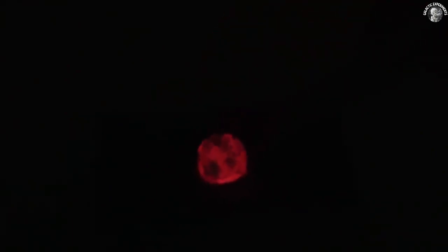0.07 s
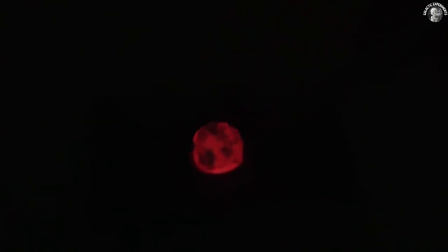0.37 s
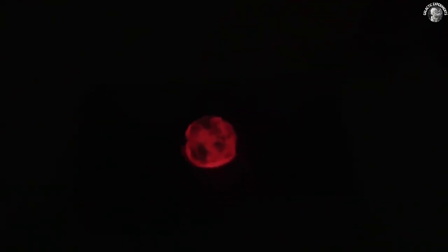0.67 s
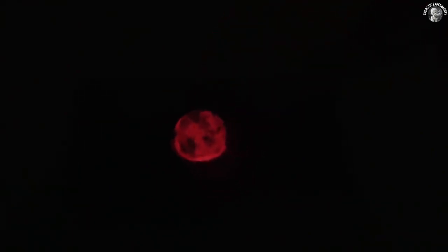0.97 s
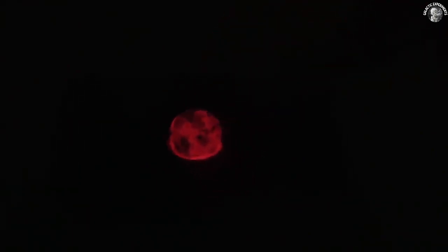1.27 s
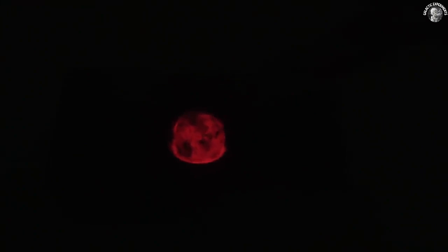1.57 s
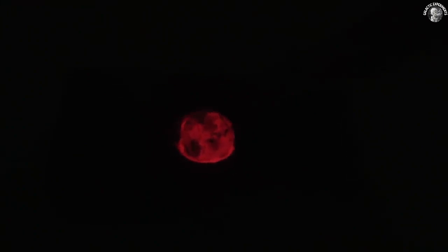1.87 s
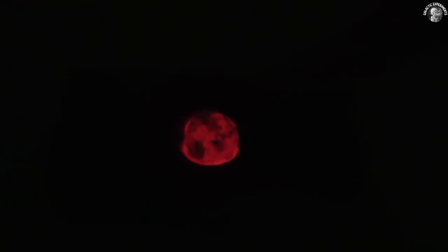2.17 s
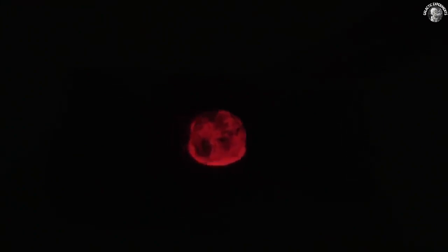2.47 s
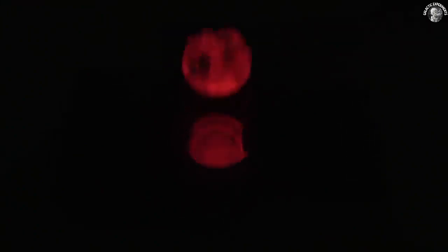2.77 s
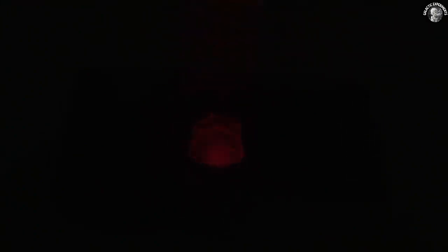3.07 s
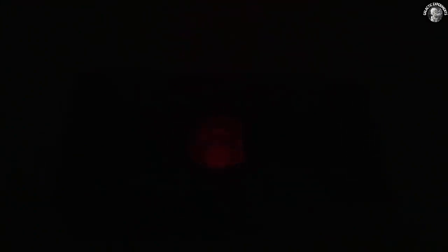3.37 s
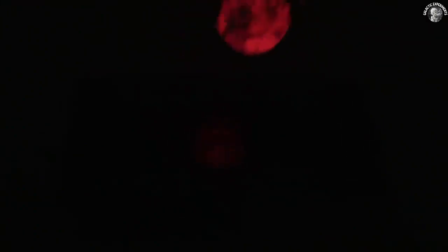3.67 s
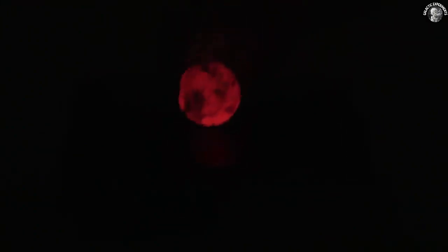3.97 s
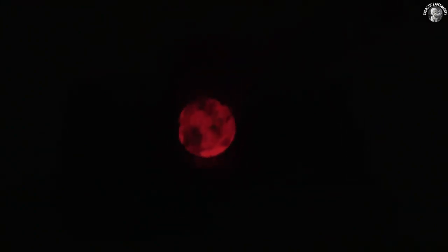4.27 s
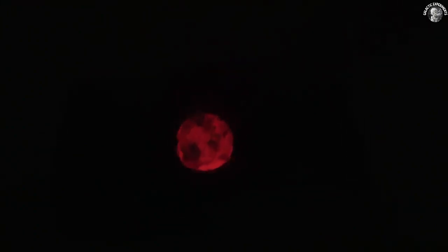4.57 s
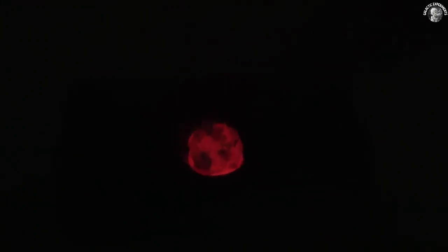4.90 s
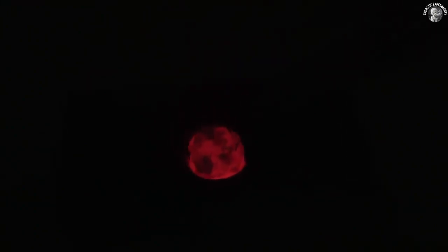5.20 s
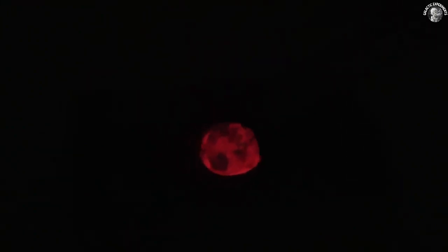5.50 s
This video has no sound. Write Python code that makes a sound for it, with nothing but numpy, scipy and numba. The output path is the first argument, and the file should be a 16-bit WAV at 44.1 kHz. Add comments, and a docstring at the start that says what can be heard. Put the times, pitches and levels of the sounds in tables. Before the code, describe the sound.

Melting foam hisses in rumbling spurts and pops under a red-hot metal ball, pausing when it is lifted, over a faint fan.

```python
"""A red-hot metal ball sinks into a block of foam, close by, in a quiet room with a fan.
From the start, gas from the melting foam hisses out in rumbling spurts, coloured by each vent it opens.
Tiny cells fizz and larger pockets pop, ringing the hollow under the ball, loudest near 1.6 s.
Near 2.7 s the ball is lifted off and the hiss sinks away, leaving faint ticks and the fan.
At 4.7 s the ball is back: spurts and pops resume for about a second, then fade."""
import sys
import numpy as np
from scipy import signal
from scipy.fft import rfft, irfft, next_fast_len
from scipy.io import wavfile
from numba import njit

SR = 44100
rng = np.random.default_rng(int(sys.argv[2]) if len(sys.argv) > 2 else 0)


def generate_wav(sig):
    """Save sig (samples, or channels by samples) to the path in sys.argv[1] as 16-bit PCM at SR."""
    pcm = np.round(np.clip(np.atleast_2d(sig).T, -1, 1) * 32767).astype(np.int16)
    wavfile.write(sys.argv[1], SR, pcm)


N = 253134
T = np.arange(N) / SR

# Steady boiling of the foam. Each row: time in seconds, level in dB, treble in dB.
BOILING = [(0, -50, -10), (.2, -48.5, -5.5), (.27, -55, -2), (.35, -47, -0.5), (.63, -45, -1),
           (.9, -47.5, -4), (1.9, -54, -5.5), (2.348, -53.5, -4), (2.71, -53.5, -20), (2.9, -63, -11),
           (4.65, -65.5, -11.5), (4.72, -52, -14), (5.17, -45, -7), (5.74, -59, -16)]
# Spurts of gas. Each row: time of full strength, rise, hold and fall, all in seconds,
# then level, treble and rumble in dB.
GAS_SPURTS = [ (0, .02, 0.043, .035, -31.5, -9, -66), (0.062, .03, .045, 0.051, -41.5, -2, -60),
              (0.712, 0.13, 0.05, .15, -36, 1, -80), (0.794, 0.076, 0.037, 0.077, -31, -3, -57),
              (0.947, 0.036, .025, .05, -38, 3.5, -73), (.985, 0.044, 0.11, .1, -29.5, -5, -62),
              (1.104, 0.17, 0.036, 0.1, -29, -3, -52), (1.181, 0.17, 0.53, 0.13, -32.7, -1, -59.5),
              (1.408, 0.12, 0.0088, 0.11, -30.5, -4.5, -61), (1.593, 0.12, 0.058, 0.12, -32, -3.5, -58),
              (1.727, .08, 0.05, 0.088, -38.5, -1.5, -62), (1.782, .05, 0.04, 0.048, -39.5, -3.5, -64),
              (2.065, 0.41, 0.074, 0.19, -47, -1.5, -74), (2.522, 0.095, 0.068, 0.058, -36, -5.5, -76),
              (2.598, 0.066, 0.024, 0.028, -33.5, -6.5, -76), (3.695, .05, 0.048, 0.14, -68, 6.5, -90),
              (4.708, 0.0082, .008, .05, -33.5, -1.5, -52), (4.728, 0.023, 0.053, 0.12, -31.5, -8.5, -61),
              (4.846, 0.1, .12, 0.11, -39, -17, -57), (5.22, 0.11, .005, 0.11, -41, -5.5, -60),
              (5.324, 0.025, 0.0026, 0.019, -35, -8.5, -58), (5.424, 0.1, 0.014, 0.025, -32, -5, -51.5),
              (5.486, 0.14, .02, 0.16, -47.5, -18, -52)]
# Gaps that the gas opens round the ball. Each row: opening and closing time in seconds,
# then a list of resonances, each with frequency in Hz, bandwidth in Hz, boost in dB.
GAS_VENTS = [ (-.05, 0.14, [(615, 58, 13.5), (1170, 260, 9.5), (1650, 130, 7.5), (2790, 120, 6.5)]),
             (0.666, 1.843, [(667, 50, 15), (1020, 90, -4), (1230, 76, 8), (1415, 19, 14.5), (1800, 110, 6),
             (2930, 120, 2.5), (4540, 210, 2.5)]), (1.84, 2.219, [(746, 160, 16.5)]),
             (2.19, 2.457, [(414, 65, 22.5)]), (2.46, 2.708, [(680, 65, 11), (900, 63, 11), (1936, 53, 10),
             (2480, 150, 7.5), (2870, 110, 7.5), (3700, 550, 5.5)]), (4.675, 4.836, [(2410, 80, 6),
             (3890, 310, 9.5), (4580, 120, 7.5)]), (4.68, 5.39, [(550, 330, 5), (970, 200, 7.5),
             (1810, 300, 3)]), (5.399, 5.475, [(710, 240, 9.5), (1880, 80, 11.5), (2910, 550, 11),
             (3700, 250, 4), (6900, 360, 9)])]
# Spectra of the bare jet, the shaken block and the fan with the room air.
# Each row: frequency in Hz, relative spectral density in dB.
JET_SPECTRUM = [(40, -50), (110, -10.5), (240, -8), (360, -10), (560, -5.5), (900, -4.5), (1300, 0),
                (2300, -0.5), (4500, 1.5), (7500, 2.5), (10000, -2), (13000, -7), (16000, -16.5)]
RUMBLE_SPECTRUM = [(20, -22), (40, -2), (90, -16), (112, 3.5), (135, -10), (240, -9.5), (340, -14),
                   (700, -48)]
FAN_SPECTRUM = [(20, -10), (40, -8), (112, -4.5), (160, -7.5), (400, -3.5), (580, -3.5), (780, 4.5),
                (930, -0.5), (1110, 3), (1330, -13), (1800, -20), (4500, -26), (7000, -20), (16000, -30)]
# Bursting gas pockets. Each row: start in seconds, level in dB, crack frequency in Hz,
# crack t60 in seconds, weight of the bright snap in dB, weight of the hollow and spray in dB.
POCKETS = [ (0.0315, -16.5, 5140, 0.0018, -3, -1.5), (0.033, -19, 1044, 0.022, -30, -20),
           (.4590, -22, 6460, 0.0061, 5, -9), (0.509, -31.5, 1930, 0.0082, -16, 5),
           (0.5476, -22, 9300, 0.0032, -2, -7), (0.9939, -1.5, 7870, 0.0033, -4, -0.5),
           (1.5697, 8, 3950, 0.0024, -5.5, -5.5), (2.2, -35, 777, 0.028, -37, -10.5),
           (2.348, -28.5, 336, 0.015, -30, -20), (3.0453, -39, 7000, 0.0032, -9, -20),
           (3.169, -45, 6000, .003, 9, -20), (3.3914, -38, 8300, 0.0033, -6, -17),
           (3.5126, -40, 7500, .003, -2, -20), (3.763, -43, 6500, 0.0035, 10.5, -20),
           (4.0375, -36.5, 4430, 0.003, -6, -16), (4.688, -38.5, 7000, 0.0032, 6, -18),
           (4.8875, -9, 2700, 0.0038, -3.5, -20), (4.9722, -9, 1070, 0.0039, -30, -33),
           (5.3125, -29, 726, 0.02, -30, -16), (5.3159, -22.5, 230, 0.02, -40, -20)]
# Modes of the hollow under the ball. Each row: frequency in Hz, relative level in dB, t60 in seconds.
HOLLOW_MODES = [(216, -17.5, 0.043), (620.4, -8.5, 0.16), (1030, 3, 0.054), (1161, 6, 0.065),
                (1404, 9.5, 0.038), (1607, 7.5, 0.035)]
# Reflections from nearby surfaces. Each row: delay in seconds, level in dB.
REFLECTIONS = [(.0041, -23), (.0088, -23)]
# Stereo width of the hiss, the pops and the fan. Each row: frequency in Hz, side over mid in dB.
HISS_SPREAD = [(100, -13), (650, -16), (1000, -32), (1400, -55), (4900, -52), (5700, -15), (9000, -10),
               (15000, -11)]
POP_SPREAD = [(200, -5), (700, -16), (1400, -34), (2500, -20), (5000, -20), (7000, -12), (15000, -8)]
FAN_SPREAD = [(50, -13), (130, -8), (700, -11), (1300, -10), (2000, -13), (3200, -20), (4800, -9),
              (6500, -4), (15000, -5)]
# Stereo balance of the foam and the fan. Each row: frequency in Hz, left over right in dB.
FOAM_BALANCE = [(200, 2.5), (400, .3), (700, -3), (1050, 0), (15000, 0)]
FAN_BALANCE = [(200, 1.5), (400, -1), (750, -5), (1300, -7.5), (1900, 0)]

SLOPE_DB = 20  # gained over a spurt's rise time, lost over its fall time
BOILING_RUMBLE_DB = -23.5  # relative to the boiling level
GAS_GAIN_DB, GAS_FLICKER_DB = 3.0, 0.56
VENT_CREEP_PER_S = 0.075  # relative rise in pitch of an open gap
BENCH_HZ, BENCH_WIDTH_HZ, BENCH_DB = 112.7, 5.0, -4  # lowest mode; level relative to the block's rumble
FAN_DB, HUM_HZ, HUM_DB, HUM_WAVER_DB = -50, 112, -73, 4
TOP_HZ = 15800


def undb(db):
    """Amplitude grows tenfold for every 20 dB."""
    return 10 ** (np.asarray(db) / 20)


def unit(x):
    """Normalisation to rms 1."""
    return x / np.sqrt(np.mean(x ** 2))


def colour(x, points, power=1):
    """Zero-phase filtering by a curve of (Hz, dB) points, its gain raised to a power."""
    hz, db = np.transpose(points)
    size = next_fast_len(len(x) + 4096)
    bin_hz = np.maximum(np.arange(size // 2 + 1) * SR / size, 1)
    gain = undb(power * np.interp(np.log(bin_hz), np.log(hz), db))
    return irfft(rfft(x, size) * gain, size)[:N]


def band(x, low_hz, high_hz):
    """Causal band-pass filtering."""
    return signal.sosfilt(signal.butter(3, [low_hz, high_hz], "band", fs=SR, output="sos"), x)


def walk(rate):
    """Random modulation with a spread near 1, changing course rate times a second."""
    steps = rng.standard_normal(8192)
    return np.sqrt(3 / 2) * np.interp(T * rate, np.arange(len(steps)), steps)


@njit
def resonate(x, hz, width_hz):
    """Forced resonance: a state-variable band-pass with gain 1 at its moving centre."""
    out = np.empty(len(x))
    band_state, low_state = 0., 0.
    for i in range(len(x)):
        tuning, damping = np.tan(np.pi * hz[i] / SR), width_hz / hz[i]
        passed = (band_state + tuning * (x[i] - low_state)) / (1 + tuning * (tuning + damping))
        band_state = 2 * passed - band_state
        low_state += 2 * tuning * passed
        out[i] = damping * passed
    return out


def ring(t, hz, t60):
    """Free vibration of a damped mode, which loses 60 dB in t60 seconds."""
    return np.sin(2 * np.pi * hz * t) * 1000 ** (-t / t60)


def add(track, start_s, sound):
    """Superposition of a sound on a track."""
    start = max(int(start_s * SR), 0)
    track[start:start + len(sound)] += sound[:N - start]


def clicks(rate, spread_db):
    """Shot noise of rms 1: independent impulses, mostly small and a few large."""
    size = undb(spread_db * np.minimum(rng.exponential(size=N), 5))
    return unit((rng.random(N) < rate / SR) * size * rng.choice([-1, 1], N))


def gas_flow():
    """Incoherent sources add in power: boiling and spurts set hiss strength, treble gain and shaking."""
    times, boil_db, boil_treble_db = np.transpose(BOILING)
    gas_power = undb(np.interp(T, times, boil_db)) ** 2
    treble_power = gas_power * undb(np.interp(T, times, boil_treble_db)) ** 2
    shake_power = gas_power * undb(BOILING_RUMBLE_DB) ** 2
    for full, rise, hold, fall, level_db, treble_db, rumble_db in GAS_SPURTS:
        away = np.maximum(full - T, 0) / rise + np.maximum(T - full - hold, 0) / fall
        envelope = undb(-SLOPE_DB * np.minimum(away, 10))
        gas_power += (envelope * undb(level_db)) ** 2
        treble_power += (envelope * undb(level_db + treble_db)) ** 2
        shake_power += (envelope * undb(rumble_db)) ** 2
    return np.sqrt(gas_power), np.sqrt(treble_power / gas_power), np.sqrt(shake_power)


def hiss(strength, brightness):
    """Source and filter: noise from turbulence and bursting cells drives the open vents' resonances."""
    source = unit(rng.standard_normal(N) + undb(-2) * clicks(rate=5000, spread_db=1.5))
    jet = unit(colour(source, JET_SPECTRUM)) * strength * undb(GAS_GAIN_DB + GAS_FLICKER_DB * walk(70))
    # a narrow, fast jet is brighter than a wide one
    treble = colour(jet, [(3000, -23.0), (5000, -8.5), (7500, -2)])
    jet += (brightness - 1) * treble
    out = jet.copy()
    wobble = 0.0019 * walk(34)
    for opens, closes, resonances in GAS_VENTS:
        gate = np.clip(np.minimum(T - opens, closes - T) / 0.009 + .5, 0, 1)
        live = gate > 0
        # the gaps tighten as the ball sinks, so their pitch creeps up
        creep = np.exp(VENT_CREEP_PER_S * (T[live] - (opens + closes) / 2) + wobble[live])
        for hz, width_hz, boost_db in resonances:
            resonance = resonate(jet[live], hz * creep, float(width_hz))
            out[live] += (undb(boost_db) - 1) * gate[live] * resonance
    return out


def rumble(shake):
    """Forced vibration: the gas shakes the block and sets the bench droning in its lowest mode."""
    drone = resonate(rng.standard_normal(N), np.full(N, BENCH_HZ), BENCH_WIDTH_HZ)
    block = colour(rng.standard_normal(N), RUMBLE_SPECTRUM)
    return (unit(block) + undb(BENCH_DB) * unit(drone)) * shake


def fan():
    """Broadband flow noise from a fan off to the right, with a faint hum wavering in level and phase."""
    level = undb(FAN_DB + 0.048 * walk(4.9))
    mid, side = (unit(colour(rng.standard_normal(N), FAN_SPECTRUM)) * level for _ in range(2))
    hum_phase = 2 * np.pi * HUM_HZ * T + 0.4 * walk(4.45)
    hum = np.sin(hum_phase) * undb(HUM_DB + HUM_WAVER_DB * walk(5.64))
    return stereo(mid, side, FAN_SPREAD, FAN_BALANCE) + hum


def crackle():
    """Sparse shot noise: the scorched foam keeps up a faint, fine ticking throughout."""
    spectrum = [(1000, -33), (4000, -16.0), (7500, 0.5), (15000, -4.5)]
    ticks = colour(clicks(rate=190, spread_db=2.5), spectrum)
    return undb(-66 + 1.8 * walk(8)) * ticks


def pops():
    """Impulsive excitation: each pocket cracks open, rings the hollow's modes and leaves a short spray."""
    out = np.zeros(N)
    t = np.arange(SR // 5) / SR
    hollow = sum(undb(db) * ring(t, hz, t60) for hz, db, t60 in HOLLOW_MODES)
    hollow *= 1 - np.exp(-t / 0.0025)
    hollow /= np.abs(hollow).max()
    snap = band(signal.unit_impulse(len(t)), 3140, 11400)
    snap /= np.abs(snap).max()
    for start, level_db, hz, t60, snap_db, hollow_db in POCKETS:
        # the skin takes about half a cycle to tear
        crack = ring(t, hz, t60) * (1 - np.exp(-2 * hz * t))
        spray = band(rng.standard_normal(len(t)), 630, 6300) * np.exp(-t / 0.0091)
        aftersound = undb(hollow_db - 11.5) * (hollow + undb(2.5) * spray)
        add(out, start, undb(level_db) * (crack + undb(snap_db) * snap + aftersound))
    return out


def room(x):
    """Convolution with the room's response: direct sound, early reflections and a short diffuse tail."""
    t = np.arange(SR // 2) / SR
    tail = band(rng.standard_normal(len(t)), 105.0, 12900) * undb(-60 * t / 0.14)
    response = undb(-11.5) * tail / np.linalg.norm(tail)
    response[0] += 1
    for delay, db in REFLECTIONS:
        add(response, delay, undb([db]))
    return signal.fftconvolve(x, response)[:N]


def stereo(mid, side, spread, balance):
    """Mid-side stereo: two close capsules share the mid and take the side with opposite signs."""
    side = colour(side, spread)
    return np.array([colour(mid, balance, .5) + side, colour(mid, balance, -.5) - side])


def scene():
    """Superposition of the foam's sounds in the room and the steady fan."""
    strength, brightness, shake = gas_flow()
    # the gas leaves all round the ball, so each capsule hears partly different eddies
    mid, side = (room(hiss(strength, brightness)) + rumble(shake) for _ in range(2))
    sizzle = stereo(mid, side, HISS_SPREAD, FOAM_BALANCE)
    # a pop comes from one spot and only reaches the capsules slightly out of phase
    cracks = room(pops() + crackle())
    quadrature = signal.hilbert(cracks, next_fast_len(N))[:N].imag
    return sizzle + stereo(cracks, quadrature, POP_SPREAD, FOAM_BALANCE) + fan()


def record(dry):
    """Hard clipping at full scale, then a steep low-pass that limits the bandwidth."""
    low_pass = signal.ellip(10, .1, 80, TOP_HZ, fs=SR, output="sos")
    return signal.sosfilt(low_pass, np.clip(dry, -1, 1))


dry = scene()
out = record(dry)
generate_wav(out)
```